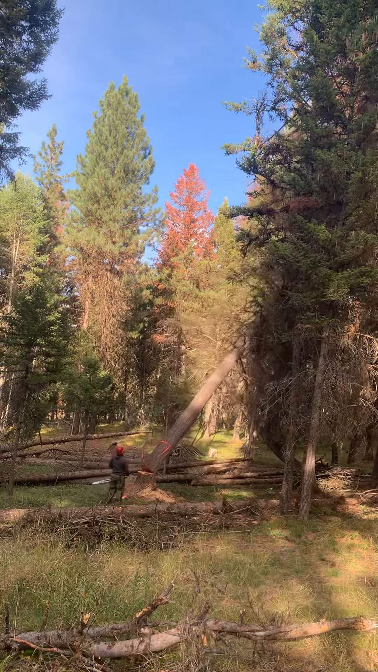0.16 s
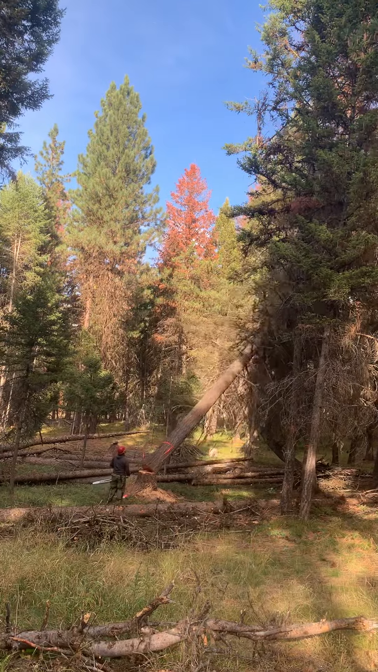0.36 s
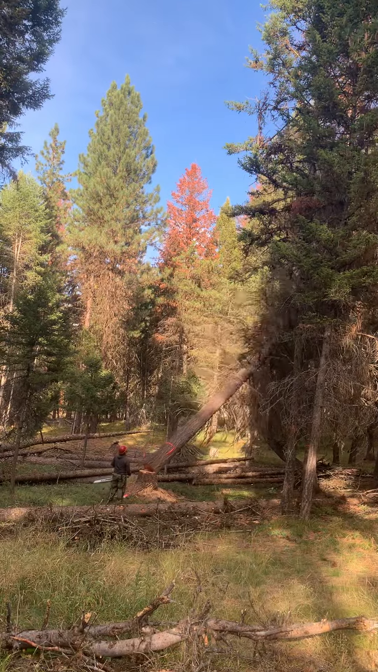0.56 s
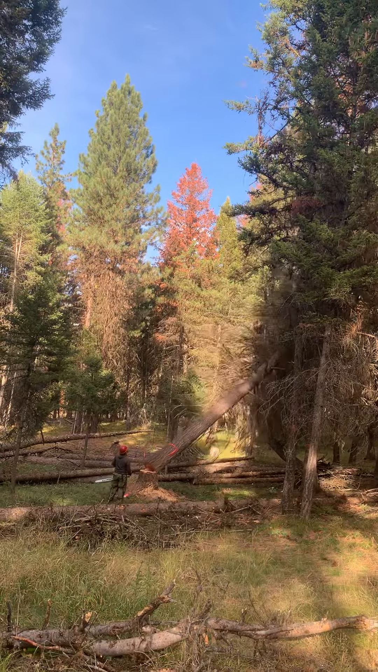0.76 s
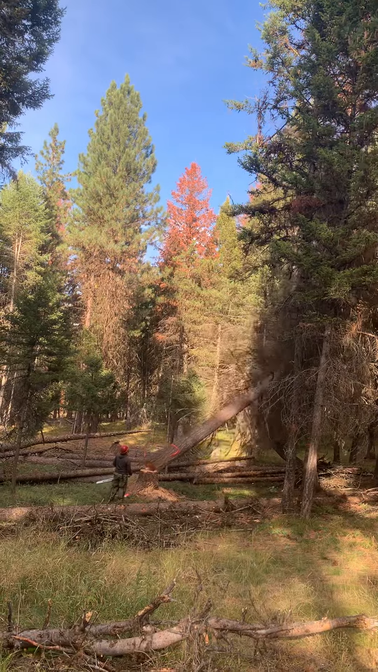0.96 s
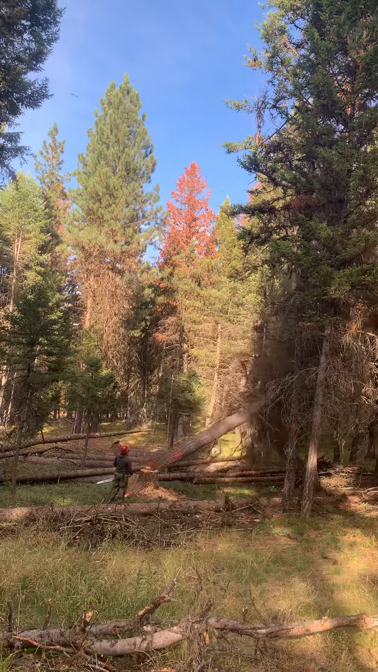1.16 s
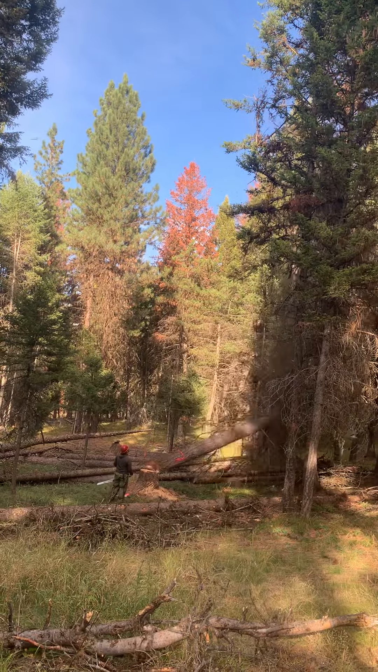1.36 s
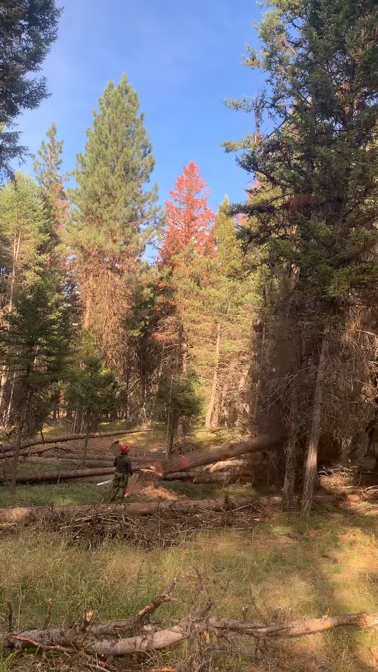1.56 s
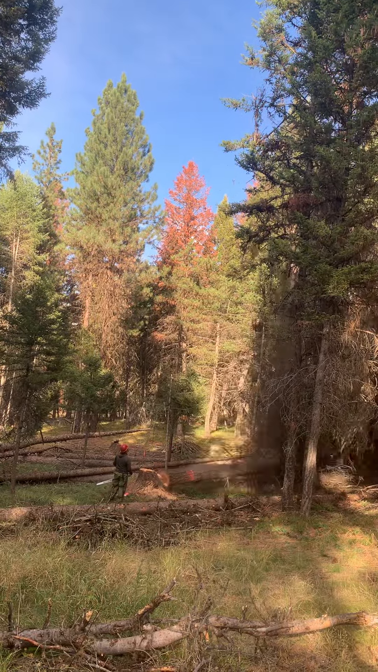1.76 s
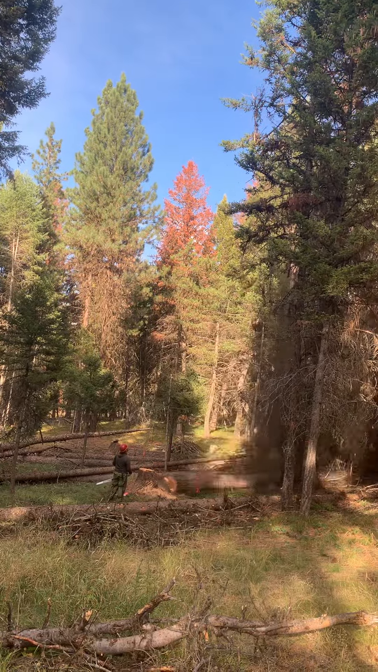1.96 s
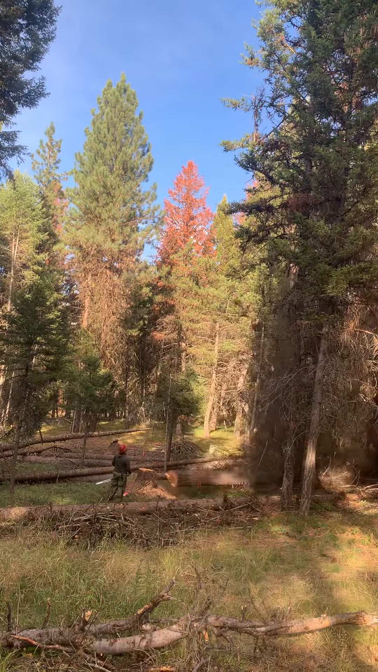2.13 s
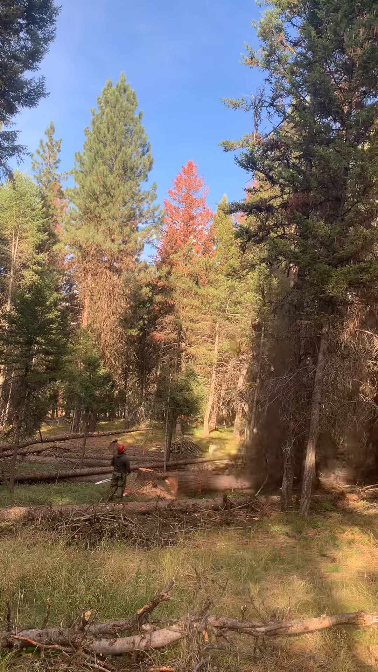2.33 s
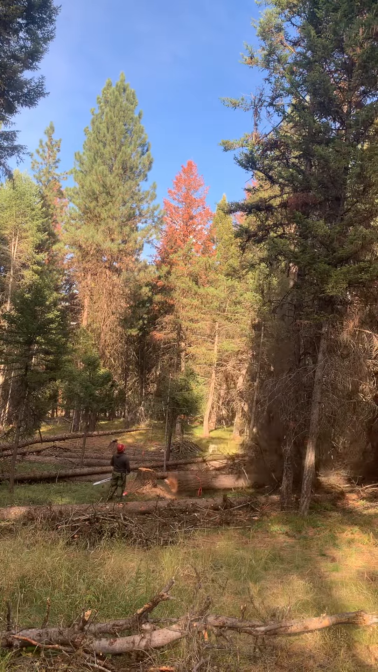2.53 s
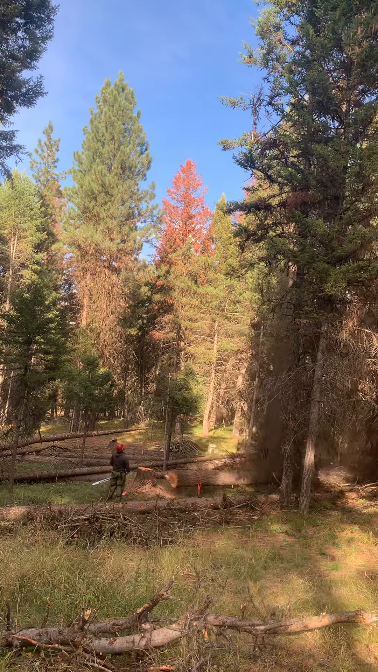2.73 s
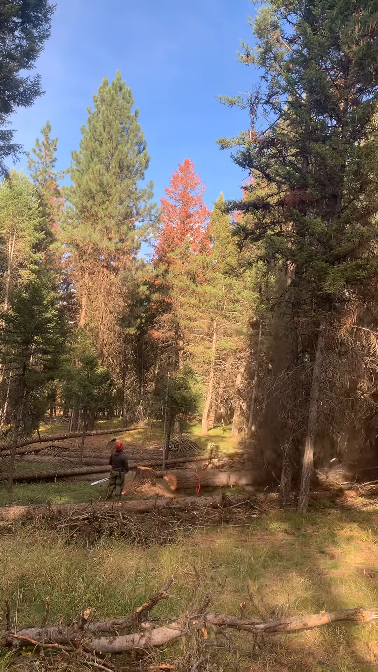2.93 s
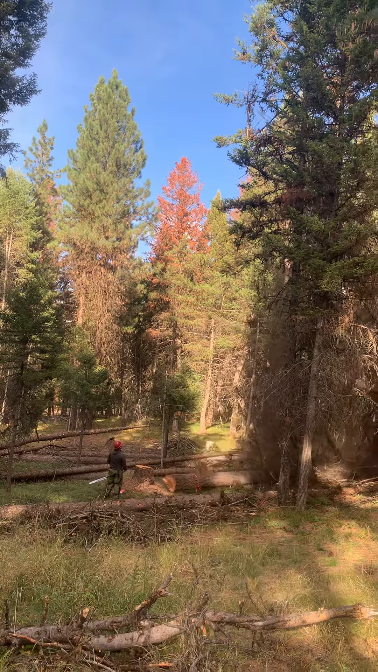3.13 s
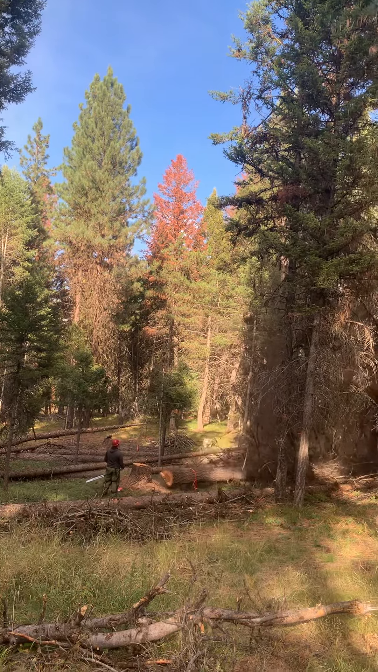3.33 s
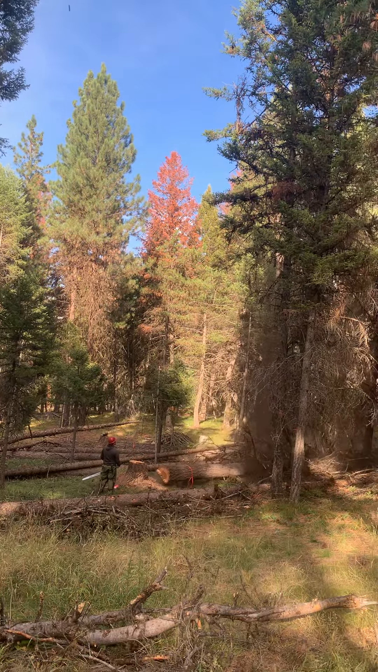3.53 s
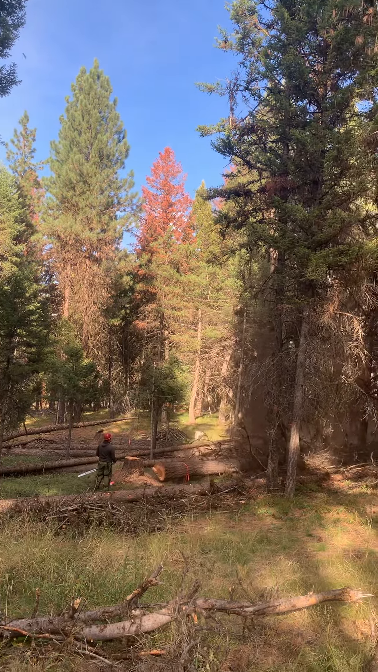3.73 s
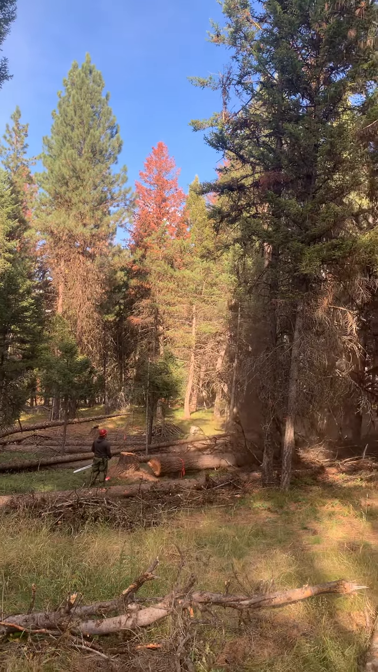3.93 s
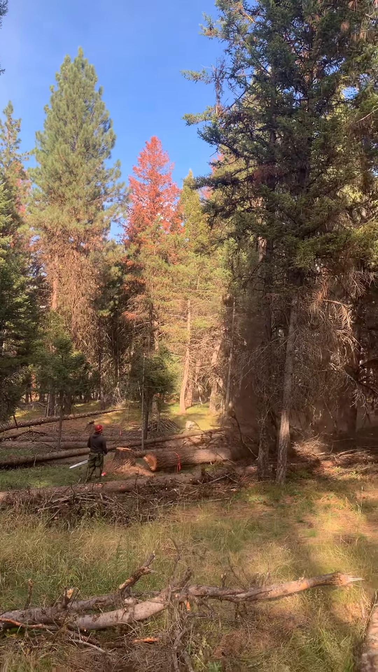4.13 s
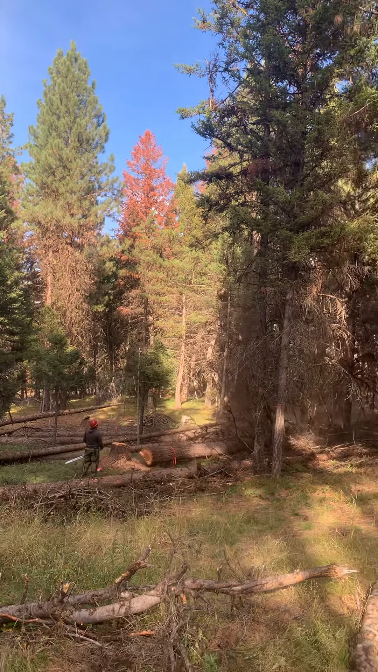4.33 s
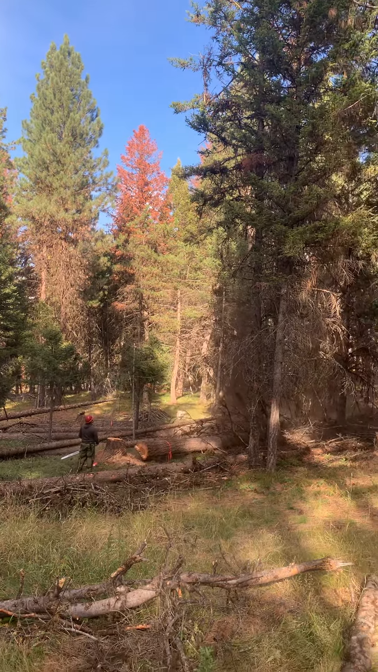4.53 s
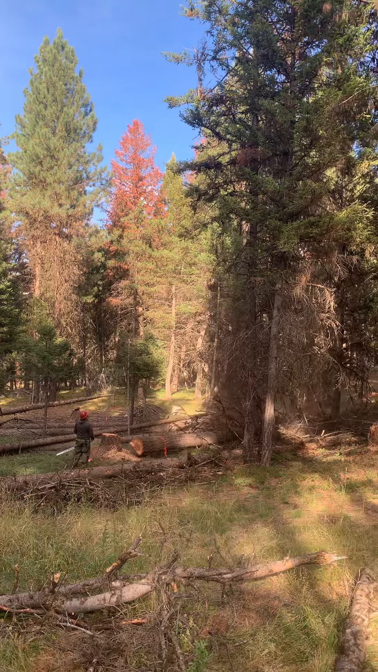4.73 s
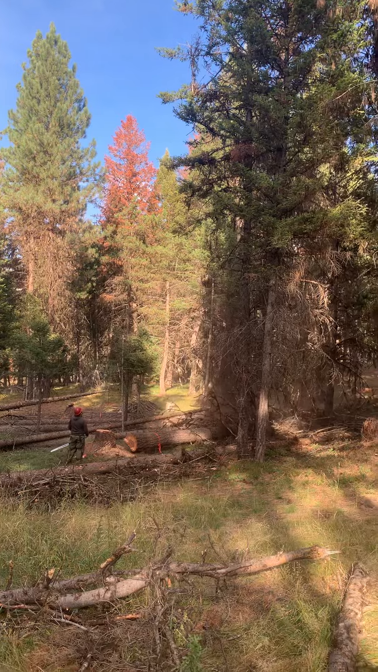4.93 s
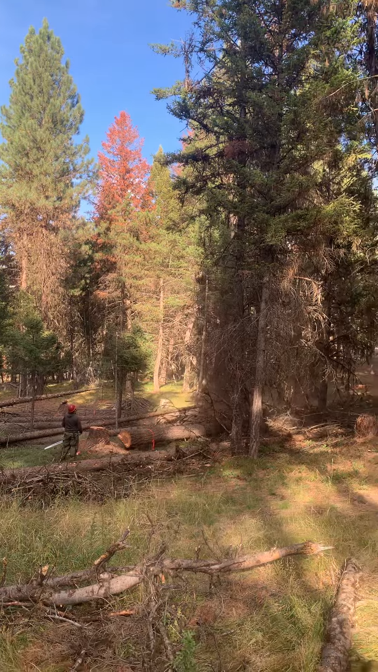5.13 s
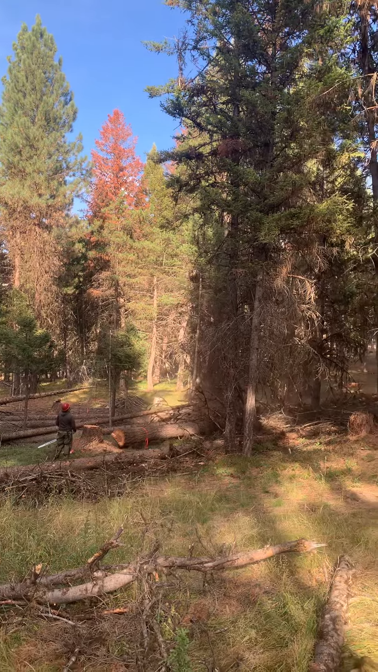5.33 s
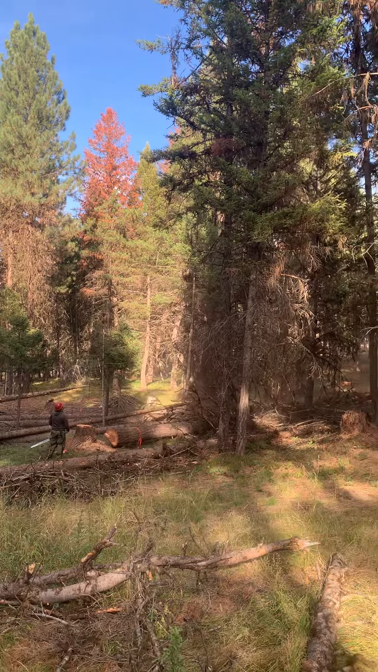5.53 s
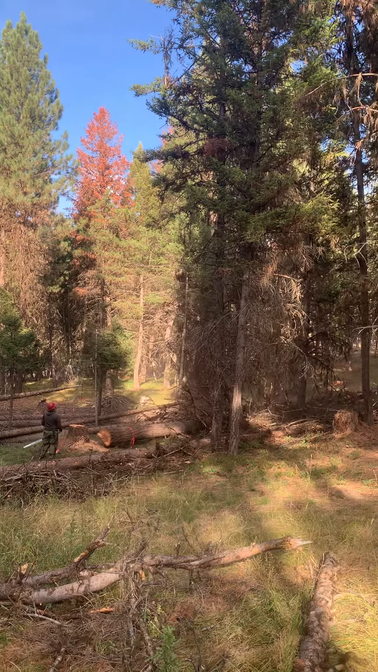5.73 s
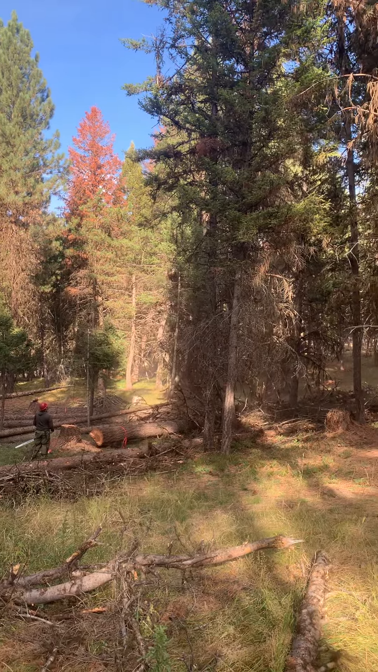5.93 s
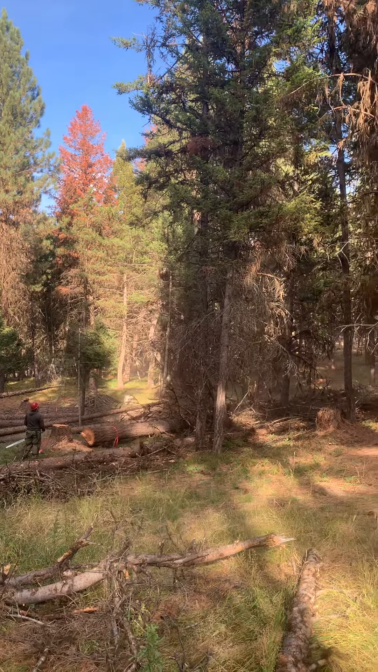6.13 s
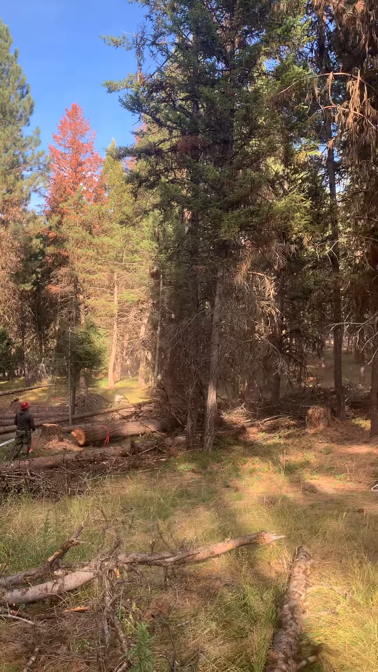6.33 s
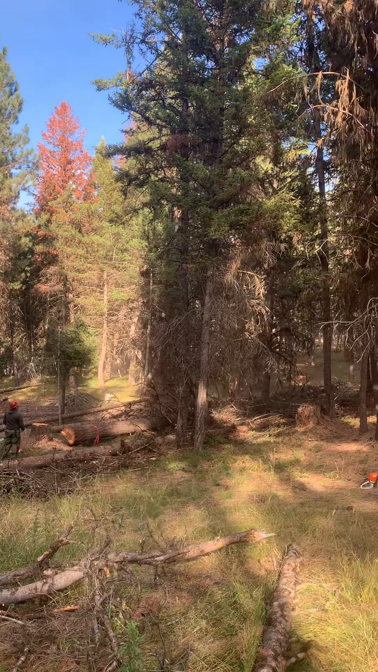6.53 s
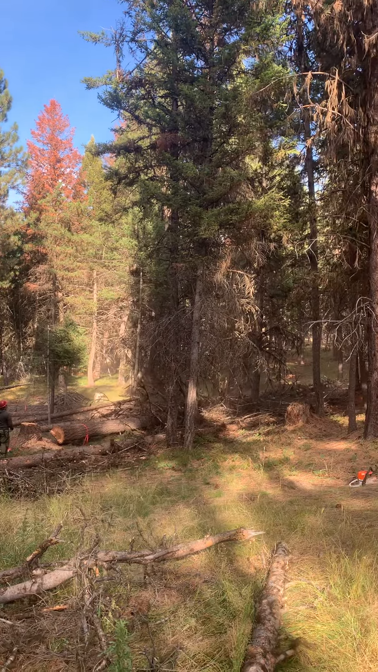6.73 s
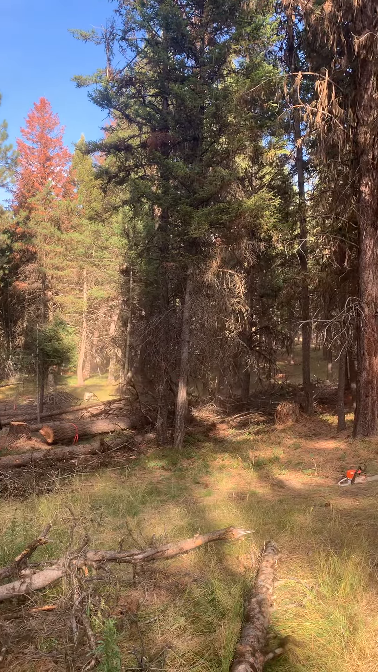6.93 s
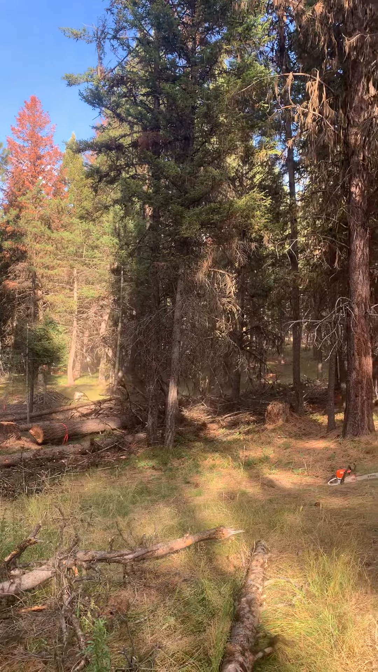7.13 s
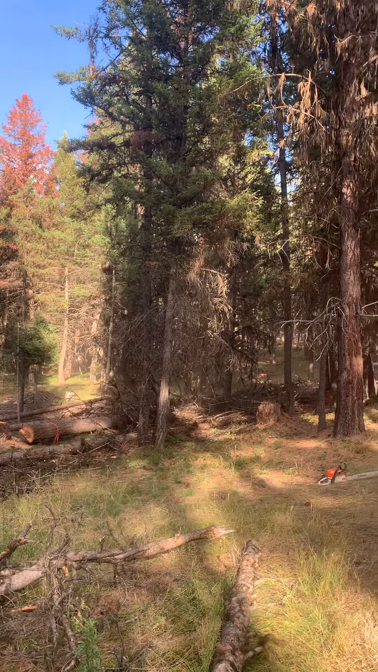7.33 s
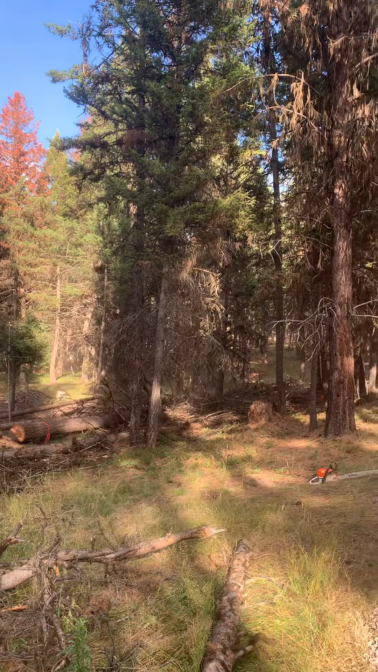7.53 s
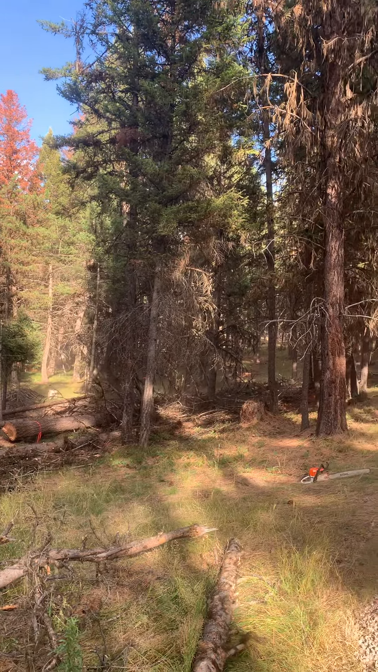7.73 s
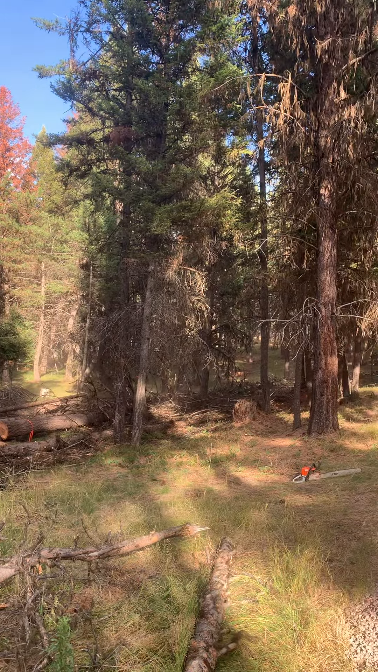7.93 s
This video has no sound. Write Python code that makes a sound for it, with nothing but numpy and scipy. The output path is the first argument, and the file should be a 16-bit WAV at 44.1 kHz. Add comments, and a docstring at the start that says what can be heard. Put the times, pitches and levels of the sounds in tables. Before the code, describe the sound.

Cracking branches and brushing twigs build for two seconds to a deep, rumbling trunk impact, followed by sparse wooden clatter and fading forest echoes.

```python
"""A tall dead conifer falls through its neighbours, some way off in a forest.
From the start there is faint low air, a rustle of twigs, and dry limbs snapping as spiky bursts of noise.
The rustle and rumble swell until, near two seconds, the trunk lands in a run of thuds: fading low tones.
Then loose pieces clatter, caught branches give way in bursts of debris, and the pile settles.
Echoes made of fading noise answer the cracks and thuds; two close microphones pick it all up."""
import sys
import numpy as np
from scipy import signal
from scipy.fft import rfft, irfft, next_fast_len
from scipy.io import wavfile
from scipy.ndimage import uniform_filter1d, map_coordinates

SR = 44100
rng = np.random.default_rng(int(sys.argv[2]) if len(sys.argv) > 2 else 0)


def log_audio(samples):
    """Write samples as a 16-bit WAV file to the path given in sys.argv[1]."""
    # one column per channel
    frames = np.atleast_2d(samples).T
    # limit to full scale, then quantise
    limited = np.clip(frames, -1, 1)
    pcm = np.round(limited * 32767).astype(np.int16)
    wavfile.write(sys.argv[1], SR, pcm)


N = 351477  # length in samples, about 8 s
T = np.arange(N) / SR

# In all tables, levels are relative: the functions below scale them further.
# limbs that snap as the tree comes down: (time [s], level [dB], ring [Hz], treble [dB])
SNAPS = [(0.035, -5, 900, -22), (0.041, -9.5, 1930, -12.5), (0.068, -12, 900, -10.5),
         (0.075, -17, 1600, -8), (0.083, -18, 2700, -5), (0.094, -18, 1620, -14.5), (0.122, -21, 1800, -7),
         (0.148, -22.5, 1600, -12), (0.231, -18, 1560, -10), (0.356, -24.5, 1506, -1),
         (0.366, -15, 1477, -5), (0.402, -28, 1158, -14), (0.431, -23.5, 1182, -9.5),
         (0.467, -25.5, 935, -27.5), (0.536, -16.5, 1900, -4.5), (0.63, -20.5, 1090, 4.5),
         (0.68, -21, 1540, -14), (0.701, -18.5, 1130, 9.5), (0.763, -22.5, 1500, -2.5),
         (0.788, -20.5, 1250, -12), (0.814, -20.5, 1170, -7), (0.909, -9.5, 1562, -10),
         (0.938, -22.5, 1540, 1), (0.951, -18, 1560, -1), (1.028, -12.5, 1000, -10.5),
         (1.055, -19, 1000, -12), (1.125, -14.5, 2250, 23), (1.181, -12.5, 2170, -13),
         (1.255, -17, 1530, 1), (1.294, -14, 1790, -6), (1.355, -13, 1170, -4), (1.436, -17.5, 1590, 8.5),
         (1.51, -25, 1200, -11), (1.539, -17.5, 1200, -10), (1.655, -17.5, 1180, -8.5),
         (1.729, -29, 1800, 4), (1.805, -21.5, 1055, -25.5), (1.858, -14.5, 1860, -14.5),
         (1.889, -14.5, 1517, -12.5), (1.932, -20.5, 1170, -0.5), (1.955, -17.5, 1900, -12.5),
         (1.978, -13.5, 1510, -23), (1.996, -20, 1950, -15.5), (2.04, -24.5, 1200, -13),
         (2.09, -18, 1200, -9.5)]
# loose pieces that clatter down afterwards: (time [s], level [dB], ring [Hz], treble [dB])
CLATTERS = [(2.749, -31, 1070, -22), (2.931, -33, 1200, -20), (2.988, -25, 940, -2),
            (3.022, -31.5, 1700, -27), (3.081, -31, 977, -11), (3.119, -33.5, 1840, -4),
            (3.167, -28, 1170, -24), (3.221, -33.5, 2050, -11), (3.378, -38.5, 1910, -14),
            (3.482, -34, 1130, -12), (3.522, -30.5, 1205, 10), (3.556, -38.5, 1600, 2),
            (3.698, -32.5, 1300, 6), (3.793, -35, 1930, -7), (3.978, -35, 970, -10),
            (4.172, -37.5, 1190, -22), (4.295, -36, 1190, -6), (4.31, -36, 1720, -26),
            (4.356, -38.5, 970, -1), (4.499, -32.5, 1030, -30), (4.659, -30, 1240, -26),
            (4.671, -34.5, 1220, -21), (4.712, -31, 1200, 5.5), (4.836, -41, 1170, -9.5),
            (4.96, -47, 1210, -17), (5.069, -46, 1860, -21), (5.156, -62, 1310, -2), (5.299, -46, 1200, 3),
            (5.337, -41, 1960, -14), (5.376, -56, 1160, -12), (5.455, -52, 1204, -20.5),
            (5.592, -44, 1900, -18), (5.737, -51, 1140, -20), (5.852, -36, 1500, -26),
            (5.941, -39.5, 900, -11), (6.335, -43, 1150, -13.5), (6.382, -47.5, 1480, -8),
            (6.475, -47.5, 1500, -31), (6.528, -34, 1140, -30), (6.55, -29.5, 930, -16),
            (6.585, -32.5, 1780, -13), (6.606, -41, 1520, 10), (6.664, -39, 1200, -1.5),
            (6.849, -46.5, 1190, -24.5), (6.927, -43.5, 1780, -27), (7.229, -47, 1504, -17),
            (7.308, -46, 930, -12), (7.903, -39, 1690, -11)]
# heavy wood meeting the ground or another trunk: (time [s], level [dB], pitch [Hz], time to fall 60 dB [s])
THUDS = [(0.043, -19, 242.8, 0.061), (0.071, -17, 211.7, 0.06), (0.625, -32, 118, 0.11),
         (1.275, -30, 125.1, 0.11), (1.416, -30.5, 129, 0.056), (1.622, -31.5, 132, 0.09),
         (1.822, -26.5, 93.8, 0.16), (1.922, -26.5, 155, 0.059), (2.002, -13, 97.4, 0.1),
         (2.037, -10, 90.1, 0.13), (2.036, -17, 158.1, 0.14), (2.092, -18, 100, 0.13),
         (2.203, -18, 112.3, 0.14), (2.252, -22, 130.3, .07), (2.335, -26.5, 94, .11),
         (2.409, -21.5, 109.3, 0.16), (2.485, -23.5, 86.6, 0.11), (2.545, -30, 86, .12),
         (2.592, -27, 102, 0.088), (2.63, -25.5, 70.1, 0.14), (2.71, -33, 81, 0.15), (2.755, -36, 94, .1),
         (2.812, -37.5, 85.4, 0.14), (2.985, -41.5, 121.8, 0.11), (3.212, -41, 88.4, 0.35),
         (3.387, -43.5, 99.7, 0.13), (3.515, -39.5, 209, 0.13), (3.72, -46, 230, 0.083),
         (3.998, -44.5, 106, 0.45), (4.397, -36.5, 165, 0.028), (4.638, -33, 174.5, 0.039),
         (4.662, -38, 112.6, 0.052), (5.945, -35.5, 118.9, 0.39), (6.549, -33.5, 200.5, 0.039),
         (6.591, -36, 109.5, 0.12), (6.595, -42, 224, 0.079), (6.7, -48, 108.4, 0.63),
         (7.159, -51.5, 112.2, 0.47), (7.225, -50, 118.2, 0.36), (7.315, -53.5, 112.2, 0.3)]
# caught branches give way and shed debris: (time [s], level [dB], time to fall 60 dB [s])
SHOWERS = [(0.089, -37.5, 0.34), (2.622, -43.5, 2.3), (3.491, -53.5, 0.66), (3.01, -41, 0.21),
           (3.528, -38.5, 0.66), (3.73, -45.5, 1.2), (4.34, -55, 8.3), (4.7, -49.5, 0.3),
           (4.902, -51, 0.48), (6.31, -66, 4.2), (6.599, -41, 0.3), (6.67, -45, 0.49), (6.868, -59, 1.5),
           (7.28, -62.5, 1.6)]
# tone of faint background air: (frequency [Hz], level [dB])
AIR = [(22, -20), (52, 5), (85, -12), (200, -30), (310, -5.5), (420, -27.5), (1200, -33), (3500, -44.5),
       (5000, -52), (10000, -40)]
# tone of twigs, needles and bark: (frequency [Hz], level [dB])
BRUSH = [(150, -18), (280, -6), (350, -8), (600, -4), (800, 0), (1200, 0), (1450, 2), (2050, -1),
         (2400, -16), (3500, -9.5), (4600, -17), (5600, -25.5), (6800, -48)]
# tone of the shaken ground: (frequency [Hz], level [dB])
GROUND = [(25, -38.5), (45, -23), (70, 11.5), (100, 8), (170, 1), (255, -8), (310, -30.5), (600, -45),
          (1500, -84.5)]
# tone of heavy boughs: (frequency [Hz], level [dB])
BOUGH = [(60, -27), (120, -3.5), (180, -5), (240, -3), (310, -31.5), (700, -44.5), (1500, -81)]
# tone of breaking dry wood: (frequency [Hz], level [dB])
DRY_WOOD = [(40, -38), (140, -18), (250, 2.5), (380, -1), (600, 0.5), (730, -3.5), (1000, 0.5),
            (2050, -2.5), (2350, -14.5), (3400, -8), (4400, -24.5), (5300, -24), (6800, -55)]
# how long the deep forest echoes: (frequency [Hz], time to fall 60 dB [s])
FOREST = [(100, 0.2), (400, 3.4), (1300, 1.1), (3500, 2.4), (7000, 0.77)]
# how far left runs ahead of right: (frequency [Hz], phase [radians])
LEAD = [(60, 0), (120, .4), (260, 2.8), (720, 3.05), (950, 4.4), (1400, 5.0), (1850, 6.2), (2250, 6.3),
        (2600, 3.5), (3300, 0.5), (4100, 1.2), (5000, 3.3), (6300, 6.3)]
# how much louder left is than right: (frequency [Hz], level difference [dB])
BALANCE_DB = [(50, -3), (100, 11.5), (170, 13), (280, 2.5), (450, -0.5), (6000, 0.5)]
# how alike left and right are for evenly spread sound: (frequency [Hz], likeness [0-1])
ALIKE = [(60, .9), (200, .88), (600, .99), (800, .8), (1300, .88), (2100, .92), (2450, .15), (3000, .2),
         (3500, .7), (4300, .55), (5100, .9), (6000, .4)]
# broad bumps and dips in the microphones' response: (centre [Hz], width [Hz], gain [dB])
BUMPS = [(264, 76, 6.5), (327, 110, -8), (524, 140, 3.5), (794, 190, 1), (970, 30, 6), (1200, 156, 9.5),
         (1285, 160, -5.5), (1560, 37, 1.5), (2700, 430, 6), (3470, 160, -0.5), (3780, 110, -1),
         (4500, 400, 1.5), (5040, 120, 0), (5040, 350, 4)]

CROWN_LANDS_S, TRUNK_LANDS_S = 1.954, 2.04
SHOWER_RISE_DB_PER_S = 224
BRITTLE_DB = 18.5  # the extra treble that goes with a tear half as long
TOP_HZ, CUTOFF_HZ, LEAK_DB = 6700, 12000, -14.5  # sound leaks through from the first to the second


def amp(db):
    """Turn decibels into a multiplier."""
    return 10 ** (np.asarray(db) / 20)


def unit(x):
    """Scale to an average (rms) strength of 1."""
    return x / np.sqrt(np.mean(x ** 2) + 1e-20)


def along(points, hz):
    """Read a curve of (frequency, value) points on a log frequency axis."""
    f, v = np.transpose(points)
    return np.interp(np.log(hz + 1), np.log(f + 1), v)


def wobble(rate):
    """A smooth random curve with this many random points a second."""
    return map_coordinates(rng.standard_normal(int(N * rate / SR) + 4), [T * rate])


def noise():
    """Two independent rows of white noise."""
    return rng.standard_normal((2, N))


def filtered(x, response):
    """Multiply each frequency in x by a response, which may be complex."""
    m = next_fast_len(N + SR // 2)
    return irfft(rfft(x, m) * response(np.fft.rfftfreq(m, 1 / SR)), m)[..., :N]


def coloured(x, spectrum):
    """Shape the tone of x with a table, then scale it to strength 1."""
    return unit(filtered(x, lambda hz: amp(along(spectrum, hz))))


def causal(x, gain):
    """Filter a short sound by a gain per frequency, with no ringing ahead of it (minimum phase)."""
    size = x.shape[-1]
    cepstrum = irfft(np.log(np.maximum(gain, 1e-6)))
    cepstrum[1:size // 2] *= 2
    cepstrum[size // 2 + 1:] = 0
    return irfft(rfft(x) * np.exp(rfft(cepstrum)))


def add(track, s, sound):
    """Mix a sound into the track at time s."""
    part = track[..., max(0, round(s * SR)):][..., :sound.shape[-1]]
    part += sound[..., :part.shape[-1]]


def swell(s, db, rise_db_per_s, fall_db_per_s):
    """A gain that grows to its peak at time s and dies away."""
    return amp(db - np.maximum((s - T) * rise_db_per_s, (T - s) * fall_db_per_s))


def together(*gains):
    """Unrelated sounds add in power."""
    return np.sqrt(sum(g ** 2 for g in gains))


def air(level_db=-56.5):
    """Faint background air: steady noise, strongest at low pitches."""
    return amp(level_db) * coloured(noise(), AIR)


def showers():
    """The gain of the debris: each burst swells quickly and trickles out."""
    return together(*[swell(s, db, SHOWER_RISE_DB_PER_S, 60 / t60) for s, db, t60 in SHOWERS])


def breakage():
    """How strongly small wood breaks: the crown brushes through, is crushed, then sheds a trickle."""
    brushing = swell(CROWN_LANDS_S, db=-33.0, rise_db_per_s=2.5, fall_db_per_s=13.5)
    crushing = swell(CROWN_LANDS_S, db=-23, rise_db_per_s=39.5, fall_db_per_s=62)
    trickle = swell(CROWN_LANDS_S, db=-57, rise_db_per_s=25.5, fall_db_per_s=4.0)
    return together(brushing, crushing, trickle, showers())


def twigs(breaking, level_db=-1, count=1900, spread_db=4.5, life_s=0.0045, rustle_db=-1, flutter_db=1,
          low_hz=700, high_hz=5500, size=768):
    """Small sticks tick briefly, each at its own pitch, over noise for rustling needles and bark."""
    sticks, t = np.zeros((2, N)), T[:size]
    for when, length, weight, angle in rng.random((count, 4)):
        hz = low_hz * (high_hz / low_hz) ** length
        tick = (np.sin(2 * np.pi * hz * t) + 2 * rng.standard_normal(size)) * np.exp(-t / life_s)
        ways = np.array([[np.cos(2 * np.pi * angle)], [np.sin(2 * np.pi * angle)]])  # share of each row
        loudness = amp(spread_db * min(-np.log(weight), 3))  # a few sticks are much louder
        add(sticks, when * N / SR, loudness * ways * tick)
    rustle = coloured(noise(), BRUSH) * amp(rustle_db + flutter_db * wobble(25))
    return breaking * amp(level_db) * unit(coloured(sticks, BRUSH) + rustle)


def weight(shower_db=-14):
    """How hard the ground is shaken: boughs take the load, the trunk lands, the pile settles."""
    leaning = swell(TRUNK_LANDS_S, db=-36, rise_db_per_s=8.5, fall_db_per_s=13.5)
    landing = swell(TRUNK_LANDS_S, db=-26, rise_db_per_s=40, fall_db_per_s=23.5)
    settling = swell(TRUNK_LANDS_S, db=-54.5, rise_db_per_s=17.5, fall_db_per_s=3.0)
    return together(leaning, landing, settling, amp(shower_db) * showers())


def heave(lumps_db=3):
    """Boughs and trunk shove the ground: low noise of uneven strength makes a rolling rumble."""
    rumble = amp(lumps_db * wobble(22)) * coloured(noise(), GROUND)
    return weight() * unit(rumble)


def boughs(level_db=-43.5, rise_db_per_s=2, fall_db_per_s=34, lumps_db=4, shower_db=-9):
    """Heavy boughs jostle nearby trees on the way down and in each shower: hollow, uneven noise."""
    drumming = unit(amp(lumps_db * wobble(35)) * coloured(noise(), BOUGH))
    falling = swell(CROWN_LANDS_S, level_db, rise_db_per_s, fall_db_per_s)
    return together(falling, amp(shower_db) * showers()) * drumming


def snaps(limbs, tear_t60, level_db, hold_s=.006, ring_db=7, ring_q=6, grain_db=3, fracture=0.17,
          spiky=.55, treble_db=10, treble_share=.75, thick_db=-9.5, body_slope=3.3, scatter_db=-3,
          dry_slope=0.05, size=8192):
    """Breaking wood: a sharp spike, then spiky noise of tearing fibres, ringing at the limb's own pitch."""
    t, hz = np.arange(size) / SR, np.fft.rfftfreq(size, 1 / SR)
    out = np.zeros((2, N))
    carried = np.zeros(N)  # what travels on into the trees
    for s, db, ring_hz, bright_db in limbs:
        # brittle wood is bright, tears for a shorter time and sends slightly less into the trees
        brittle_db = max(bright_db + treble_db, 0)
        length = .5 ** (brittle_db / BRITTLE_DB)
        fibres = rng.standard_normal((2, size)) * np.exp(spiky * rng.standard_normal(size))
        tearing = amp(-60 * np.maximum(t - hold_s * np.sqrt(length), 0) / (tear_t60 * length))
        force = fibres * tearing * amp([[0], [scatter_db]])
        force[0, 0] += fracture * np.linalg.norm(force[0])
        limb = 1 + amp(ring_db) / np.hypot(1, ring_q * (hz / ring_hz - ring_hz / (hz + 1)))
        # every limb has its own lesser resonances
        modes = grain_db * unit(uniform_filter1d(rng.standard_normal(len(hz)), size=30))
        treble = treble_share * (bright_db + treble_db) * along([(1900, 0.24), (2600, 0.98)], hz)
        # thick limbs are louder and deeper
        body_curve = along([(330, 0.78), (500, 0.35), (760, 0.65), (1150, 0.046)], hz)
        body = body_slope * max(db - thick_db, 0) * body_curve
        crack = causal(force, amp(along(DRY_WOOD, hz) + modes + treble + body) * limb)
        # set the level by the total energy, as if spread over 10 ms
        crack *= amp(db + level_db) / np.sqrt(np.sum(crack[0] ** 2) / (0.01 * SR))
        add(out, s, crack)
        add(carried, s, crack[0] * amp(-dry_slope * brittle_db))
    return out, carried


def lesser_limbs(breaking, over_db=-1.0, thickest_db=-31, spread_db=2, low_hz=950, high_hz=2000,
                 treble_db=-11, treble_spread_db=10, count=200):
    """Thinner limbs break at random times, with levels that follow the debris around them up to a cap."""
    rows = []
    for k, (when, length, force, brittle) in enumerate(rng.random((count, 4))):
        i = int((k + when) * N / count)
        db = min(20 * np.log10(breaking[i]) + over_db, thickest_db) + spread_db * (2 * force - 1)
        ring_hz = low_hz * (high_hz / low_hz) ** length
        bright_db = treble_db + treble_spread_db * (2 * brittle - 1)
        rows.append((i / SR, db, ring_hz, bright_db))
    return rows


def thuds(blows, attack_s=0.0024, crush_db=-12, spread=1.5, low_hz=45):
    """A blow on soil or wood: a low, fading tone of the log, with dull crushing noise around its pitch."""
    out, t = np.zeros(N), T[:SR // 2]
    for s, db, hz, t60 in blows:
        band = signal.butter(3, [hz / spread, hz * spread], "band", fs=SR, output="sos")
        crush = unit(signal.sosfilt(band, rng.standard_normal(SR))[-len(t):])
        push = np.sin(2 * np.pi * hz * t) + amp(crush_db) * crush
        # a soft start, then a fade kept within .03 to .45 s
        shape = np.expm1(-t / attack_s) ** 2 * amp(-60 * t / np.clip(t60, .03, .45))
        add(out, s, amp(db) * push * shape / shape.max())
    out = signal.sosfilt(signal.butter(2, low_hz, "high", fs=SR, output="sos"), out)
    return np.array([out, np.zeros(N)])


def recoils(limbs, knock_db=-40, limb_db=-18, grows=0.95, hz=205, t60=0.11, spread_db=3.5):
    """The bough behind each break springs back with a dull knock, weaker for quieter breaks."""
    rows = []
    for (s, db, *_), (a, b) in zip(limbs, rng.standard_normal((len(limbs), 2))):
        level_db = knock_db + grows * (min(db, -12) - limb_db) + spread_db * a
        rows.append((s, level_db, hz * np.exp(0.1 * b), t60))
    return rows


def forest(x, echo_db, near_db, near_t60=0.18, build_s=0.004, count=4):
    """Trees echo: sparse random taps for near trunks, longer fading noise for the deep stand."""
    out = np.zeros((2, N))
    for k in range(count):
        hz, t, z = signal.stft(rng.standard_normal((2, SR)), SR, nperseg=256)
        fade = amp(-60 * t / along(FOREST, hz)[:, None]) * -np.expm1(-t / build_s)
        far = signal.istft(z * fade, SR, nperseg=256)[1][:, :SR]
        taps = rng.standard_normal((2, SR)) * (rng.random(SR) < .02)
        near = taps * amp(-60 * T[:SR] / near_t60)
        paths = (amp(echo_db) * unit(far) + amp(near_db) * unit(near)) / np.sqrt(SR)
        # echo patterns take turns every tenth of a second, as the breaks move along the tree
        turn = np.floor(T * 10) % count == k
        heard = x * uniform_filter1d(turn * 1., 200)
        out += signal.fftconvolve(heard[None], paths, axes=1)[:, :N]
    return out


def clatters():
    """Loose pieces land like snaps, but tear longer and ring less sharply."""
    return snaps(CLATTERS, tear_t60=.058, level_db=-7.5, ring_db=5, ring_q=3.5, grain_db=2)


def microphones(field):
    """Sound reaches two close microphones with differences in phase, level and likeness."""
    def port(hz, sign):
        """How one microphone (+1 left, -1 right) mixes the two rows of sound."""
        turn = np.arccos(along(ALIKE, hz)) / 2
        offset = amp(sign * along(BALANCE_DB, hz) / 2) * np.exp(sign * .5j * along(LEAD, hz))
        return offset * np.array([np.cos(turn), sign * np.sin(turn)])
    return np.array([filtered(field, lambda hz: port(hz, sign)).sum(0) for sign in (1, -1)])


def scene():
    """Snaps, thuds and debris with their forest echo, over faint low air."""
    breaking = breakage()
    cracks, carried = snaps(SNAPS + lesser_limbs(breaking), tear_t60=.034, level_db=-7.2)
    clatter, clatter_carried = clatters()
    blows = thuds(THUDS + recoils(SNAPS + CLATTERS))
    into_trees = carried + clatter_carried + amp(-7.0) * blows[0]
    echo = forest(into_trees, echo_db=-8.5, near_db=-6.5)
    return microphones(air() + twigs(breaking) + heave() + boughs() + cracks + blows + echo + clatter)


def record(dry):
    """The microphones colour the sound; the highest peaks are rounded and the top treble held down."""
    def colour(hz):
        """Add up the bumps of the microphones' response."""
        return amp(sum(db / (1 + (2 * (hz - centre) / width) ** 2) for centre, width, db in BUMPS))

    def band_limit(hz):
        """Fall steeply above TOP_HZ to a fixed leak, then to silence at CUTOFF_HZ."""
        steep = 1 / np.sqrt(1 + (hz / TOP_HZ) ** 48)
        return (hz < CUTOFF_HZ) * np.maximum(amp(LEAK_DB), steep)

    x = filtered(dry, colour)
    x = x / (1 + (x / .95) ** 12) ** (1 / 12)
    return filtered(x, band_limit)


dry = scene()
out = record(dry)
log_audio(out)
```